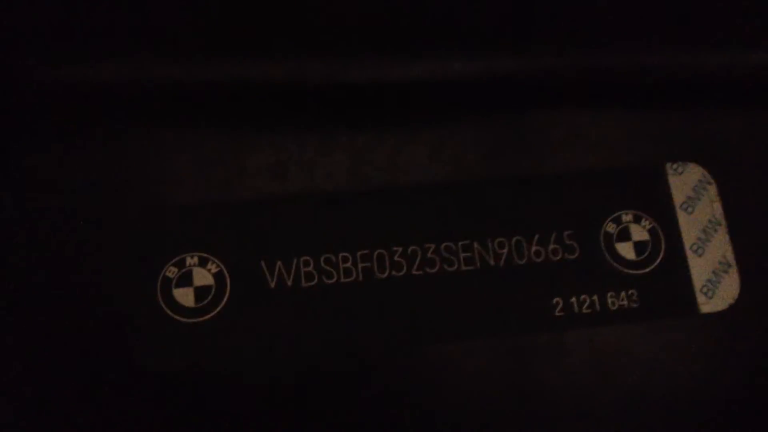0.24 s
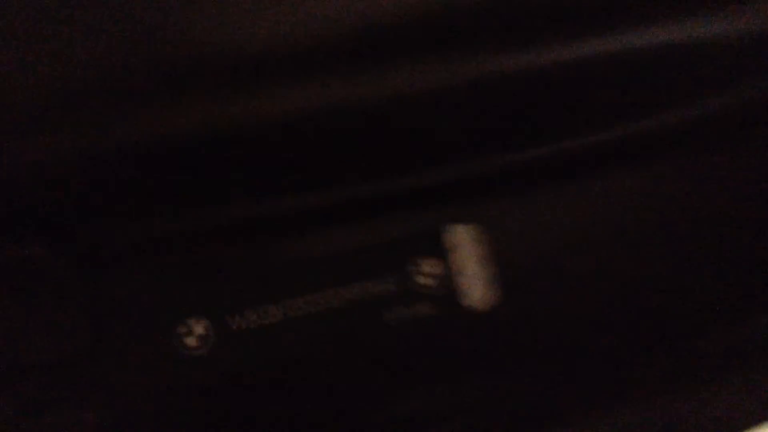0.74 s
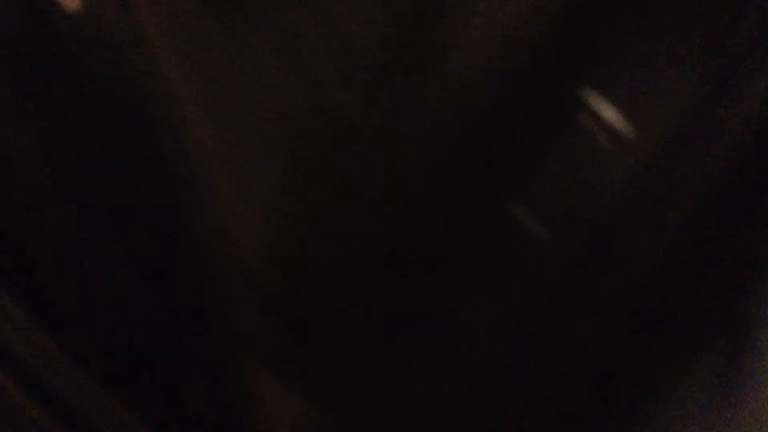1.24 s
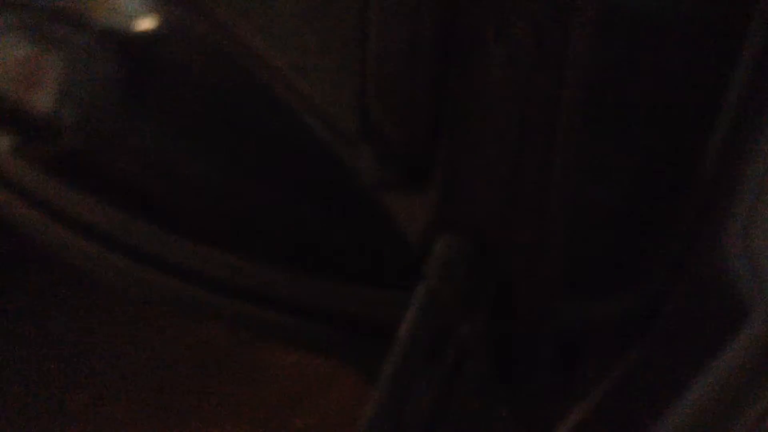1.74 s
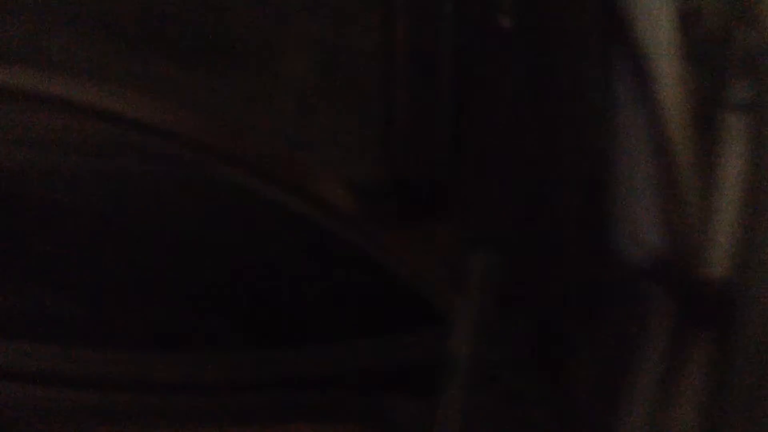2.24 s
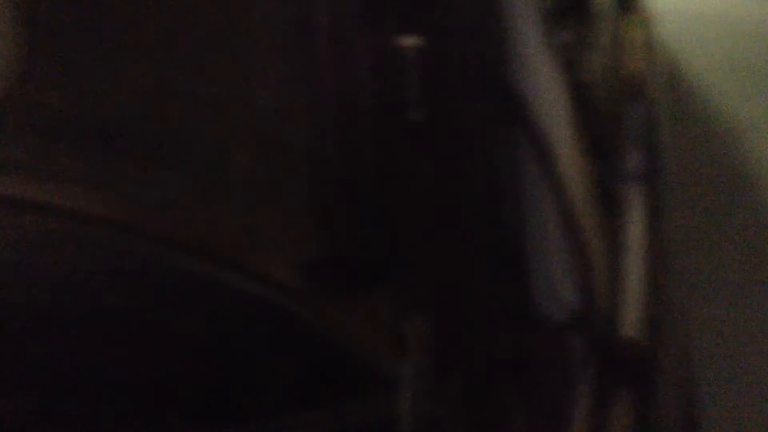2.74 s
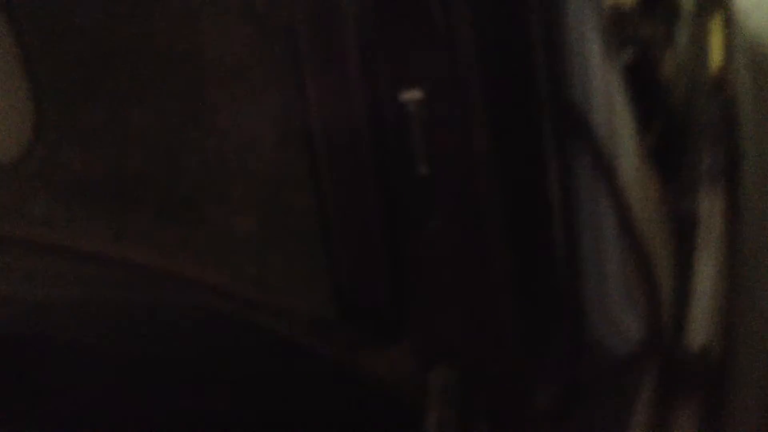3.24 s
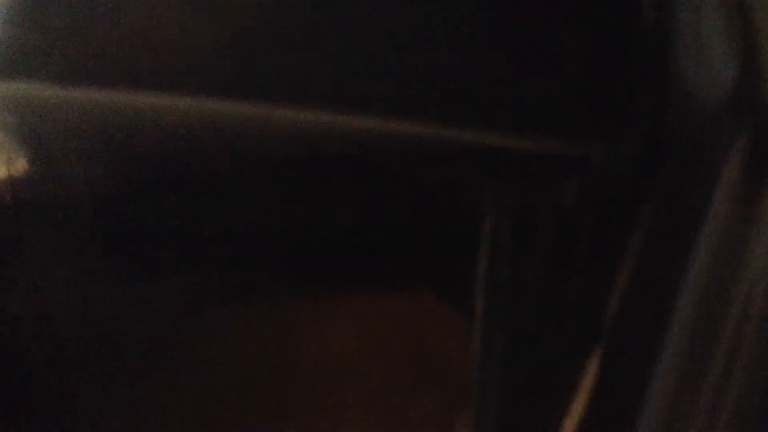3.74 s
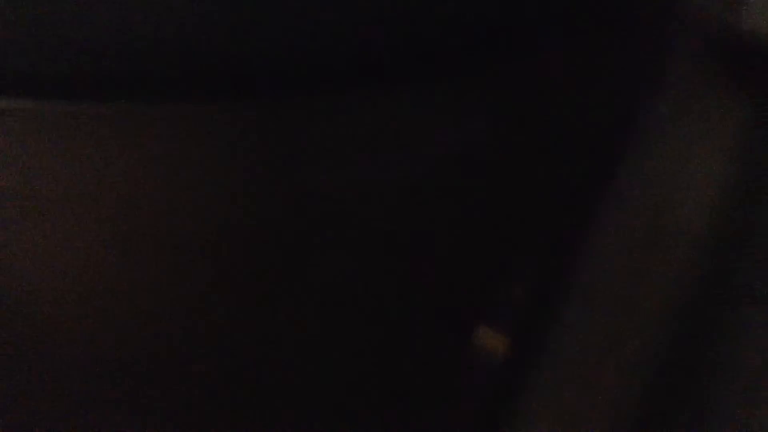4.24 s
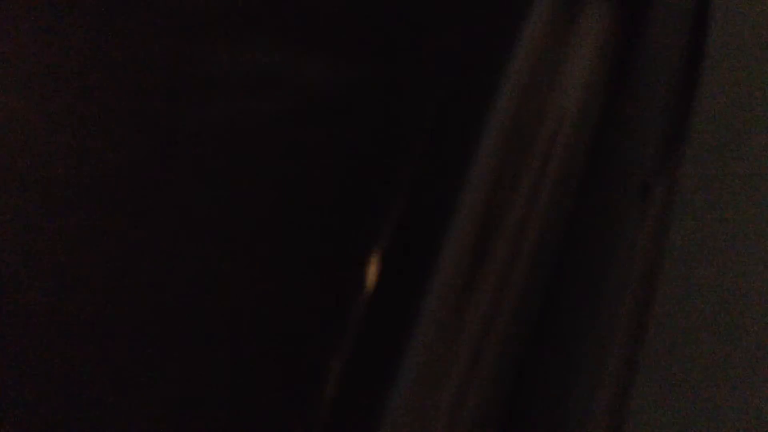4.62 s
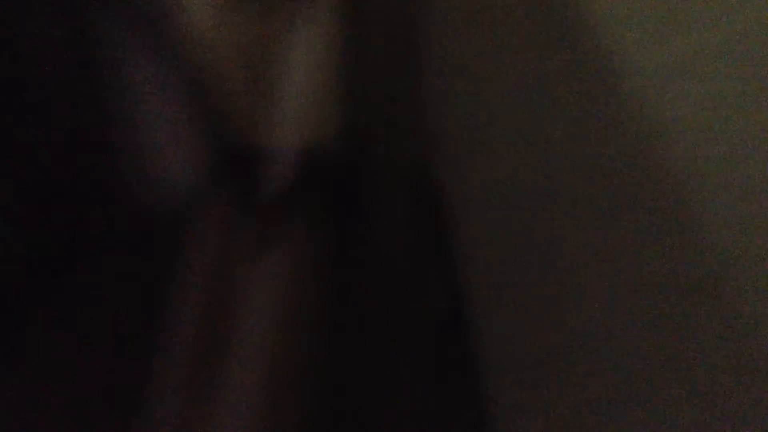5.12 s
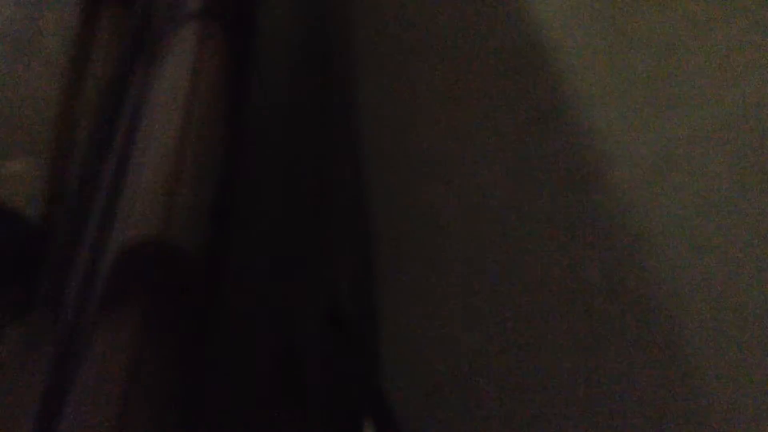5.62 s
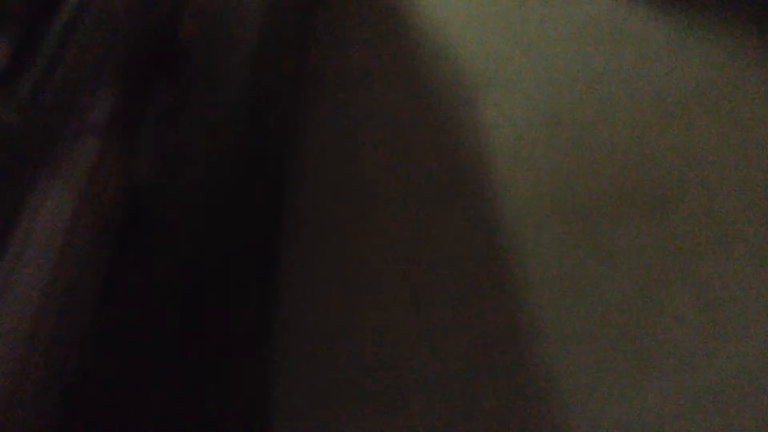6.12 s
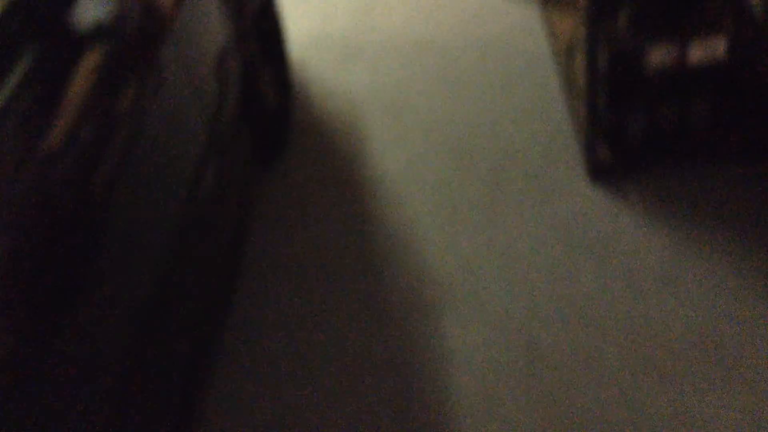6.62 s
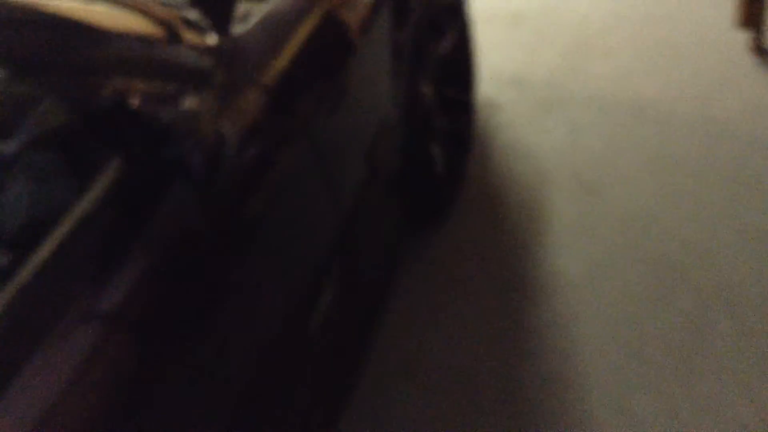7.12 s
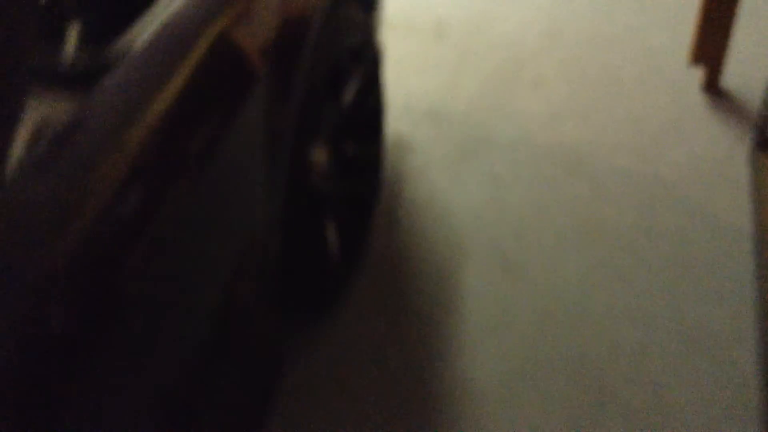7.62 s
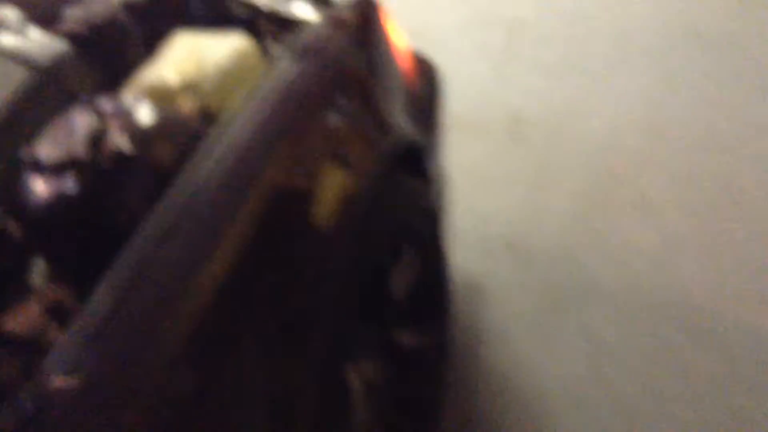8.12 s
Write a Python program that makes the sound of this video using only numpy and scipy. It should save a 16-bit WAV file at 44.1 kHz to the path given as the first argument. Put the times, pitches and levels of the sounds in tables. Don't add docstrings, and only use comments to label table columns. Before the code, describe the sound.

Steady low engine idle with buzzing panels and belt hiss, brief squeaky shoe scuffs, two thin clicks, then one loud nearby car door slam.

```python
import sys
import numpy as np
from scipy import signal
from scipy.io import wavfile

SR = 44100
rng = np.random.default_rng(int(sys.argv[2]) if len(sys.argv) > 2 else 0)


def int16_out(signal):
    q = np.round(np.clip(np.atleast_2d(signal).T, -1, 1) * 32767)
    wavfile.write(sys.argv[1], SR, q.astype(np.int16))


def voltage_ratio(decibels):
    exponent = np.asarray(decibels, float) / 20
    return 10 ** exponent


N = 368676

# (time [s], exhaust level [dB],
# lean of the garage's standing waves away from the main mode [dB])
TAILPIPE_WALK = [(0.0, -19, -1), (0.77, -14, -4), (1.14, -18, 3), (2.89, -18.5, 2), (3.7, -18.5, 2),
                 (4.05, -16.5, -5.5), (4.31, -20, 2.5), (4.51, -19.5, -2), (5.08, -18, -0.5),
                 (5.26, -15.5, -9), (5.87, -21, -0.5), (6.22, -25, -3.5), (6.55, -33.5, 4),
                 (6.96, -27.5, 0.5), (7.24, -26, 4), (7.68, -35, 14), (7.94, -26, 6.5), (8.36, -28.5, 2)]
# (time [s],
# panels [dB], bay # [dB]), 0 = usual level
NEARNESS = [(0, 5.5, 1), (.7, 5, 0), (1.0, 2, 1.3), (1.6, 7, 0.8), (2.2, -2, 0.5), (3.1, -2.5, 0.5),
            (3.45, 1, 0), (4.3, 1, 0.5), (4.5, -.5, -2.5), (5.2, 0.5, -1), (5.7, -5.5, 0.6), (6.4, 1.5, 2),
            (7.3, 2.5, 3.5), (7.6, -2, 3), (8.0, 0.5, 4.5), (8.36, -2.5, 6)]
PANEL_DB = -35.5


def rms_one(x):
    return x / np.sqrt(np.mean(x ** 2) + 1e-20)


def in_time(rows):
    s, *columns = np.transpose(rows)
    return [np.interp(np.arange(N) / SR, s, c) for c in columns]


def at_hz(points, hz):
    table_hz, values = np.array(points).T
    return np.interp(np.log(hz), np.log(table_hz), values)


def drift(rate):
    r = np.exp(-80 * np.pi * rate / SR)
    slow = signal.lfilter([1], [1, -2 * r, r * r], rng.standard_normal(N // 40 + 2002))[2000:]
    return np.interp(np.arange(N) / 40, np.arange(len(slow)), rms_one(slow))


def resonance(x, hz, width_hz):
    r = np.exp(-np.pi * width_hz / SR)
    section = [(1 - r * r) / 2, 0, (r * r - 1) / 2, 1, -2 * r * np.cos(2 * np.pi * hz / SR), r * r]
    return signal.sosfilt([section, section], x + 1e-18)


def bands(spectrum, size=N):
    low, high = spectrum[0][0], spectrum[-1][0]
    edges = np.geomspace(low, high, int(3 * np.log2(high / low)) + 2)
    centres = np.sqrt(edges[1:] * edges[:-1])
    white = rng.standard_normal((2, size + SR // 4))
    noise = []
    for k, hz in enumerate(centres):
        band_pass = signal.butter(2, edges[k:k + 2], "band", fs=SR, output="sos")
        noise.append(voltage_ratio(at_hz(spectrum, hz)) * signal.sosfilt(band_pass, white[k % 2])[-size:])
    noise = np.array(noise)
    return centres, noise / np.std(noise.sum(axis=0))


def pulses(at_s, sizes):
    out = np.zeros(N + 2 * SR)
    np.add.at(out, np.round((at_s + 1) * SR).astype(int), sizes)
    return out


def crossing(peaks, between_db):
    t = np.arange(N) / SR
    return voltage_ratio(between_db) + sum(voltage_ratio(db) * np.exp(-((t - s) / width_s) ** 2) for s, width_s, db in peaks)


def exhaust(turned, uneven_db):
    # (strength [dB], lag in the manifold [ms])
    cylinders = [(5.0, -0.55), (-0.3, -2.07), (-0.9, -0.72), (-2.1, -1.87), (1.1, -0.71), (-2.8, -1.15)]
    # (frequency at steady speed [Hz], width [Hz], level
    # [dB], polarity [+-1])
    pipe = [(63.0, 71.3, -51.3, 1), (122.1, 56.4, -40.9, 1), (152.4, 14.9, -20.4, 1),
            (176.3, 10.0, -9.9, 1), (186.8, 17.4, -20.6, -1), (215.0, 11.8, -32.2, 1),
            (232.5, 11.5, -24.4, 1), (266.9, 55.6, -42.0, 1), (275.4, 90.0, -51.9, -1),
            (330.9, 10.0, -46.9, -1)]
    # (time [s], half width [s], level [dB])
    high_mode_peaks = [(1.3, 0.71, -33), (3.0, 1.3, -30), (5.3, 0.36, -35), (6.2, 0.23, -31.5),
                       (7.0, 0.44, -37), (8.36, 0.37, -30.5)]
    steady_cycles_per_s = 6.19

    firing = np.arange(-30, 330)
    strength_db, lag_ms = np.transpose(cylinders)[:, firing % 6]
    sizes = voltage_ratio(strength_db + uneven_db * rng.standard_normal(len(firing)))
    fired = pulses(firing / 6 / steady_cycles_per_s + lag_ms / 1000, sizes)
    low_cut = signal.butter(8, 143.4, "high", fs=SR, output="sos")
    fired = signal.sosfiltfilt(low_cut, fired)

    groups = np.zeros((3, len(fired)))
    for hz, width_hz, db, polarity in pipe[2:]:
        group = np.searchsorted([160, 220], hz)
        groups[group] += polarity * voltage_ratio(db) * resonance(fired, hz, width_hz)
    read_at = SR * (1 + turned / steady_cycles_per_s)
    heard = [rms_one(np.interp(read_at, np.arange(len(fired)), v)) for v in groups]

    level_db, lean_db = in_time(TAILPIPE_WALK)
    low_gain = voltage_ratio(level_db - 6.5 + 0.96 * lean_db)
    high_gain = crossing(high_mode_peaks, -49.5)
    gains = [low_gain, voltage_ratio(level_db), high_gain]
    return sum(gain * v for gain, v in zip(gains, heard))


def drone(turned):
    # (order [per engine cycle], level [dB])
    low_orders = [(6, -20), (9, -5), (12, 0), (15, -1)]
    # (time [s], half width [s], level [dB])
    peaks_18 = [(1.2, 0.31, -48), (2.6, 0.65, -48), (6.4, 0.75, -42.5), (7.9, 0.47, -44)]
    peaks_36 = [(0, 0.27, -37), (5.27, 0.099, -26.5), (5.95, 0.47, -26), (7.6, 0.29, -32), (8.3, 0.14, -37)]
    peaks_39 = [(.2, 0.58, -26), (2.3, 0.13, -38), (3.3, 1, -39), (5.7, .6, -31), (7.3, 0.42, -37)]
    peaks_30 = [(0, 0.46, -19.5), (5.4, .3, -64), (7.1, .3, -35.5), (8.36, 0.22, -28.5)]
    peaks_whine = [(0, 0.71, -47), (1.5, 0.37, -50), (3.3, 0.99, -52), (6.1, 0.57, -50),
                   (8.36, 0.68, -46.5)]
    floor_db = (-51.5, -68, -87.5, -72, -56)

    low_db = -59.5 + 0.37 * (in_time(TAILPIPE_WALK)[0] + 18)
    *high, thin = map(crossing, [peaks_18, peaks_36, peaks_39, peaks_30, peaks_whine], floor_db)
    orders = [(order, voltage_ratio(low_db + db)) for order, db in low_orders]
    orders += list(zip([18, 36, 39, 30], high))
    hum = 0
    for order, gain in orders:
        hum = hum + gain * np.sqrt(2) * np.cos(2 * np.pi * (order * turned - .2))
    whine = np.sin(2 * np.pi * 199.2 * turned + 1.4 * drift(8))
    return hum + thin * voltage_ratio(2.2 * drift(5)) * whine


def panels(turned, loose_db, shaken):
    # (frequency [Hz], width [Hz], level [dB], place in the cycle [0-1])
    loose_panels = [(242, 35, -6, 0.5), (302.8, 24, -4.5, .89), (327.7, 52, -8, 0.5),
                    (407.2, 22, 1.5, 0.72), (451, 24, -11, 0.17), (727, 20, -17, 0.3)]
    firing = np.arange(54 * 6)
    near_db = in_time(NEARNESS)[0]
    thick_db, thin_db = PANEL_DB + near_db, -40.5 + 0.42 * near_db
    out = 0
    for hz, width_hz, db, place in loose_panels:
        chance = rng.standard_normal((len(firing), 3))
        due = firing / 6 + place - 1 + .012 * chance[:, 1]
        sizes = np.where(firing % 6 == 0, voltage_ratio(loose_db * chance[:, 0]), .4 * chance[:, 2])
        at_s = np.interp(due, turned, np.arange(N) / SR, left=-.05, right=N / SR)
        knock = pulses(at_s, sizes)
        drive = rms_one(knock) + shaken * rng.standard_normal(len(knock))
        ring = rms_one(resonance(drive, hz, width_hz)[SR:SR + N])
        out = out + voltage_ratio(db + (thin_db if hz > 350 else thick_db)) * ring
    return out


def engine():
    # (time [s], engine cycles per second [Hz])
    crank = [(0.0, 5.992), (0.71, 6.044), (1.22, 6.319), (1.8, 6.232), (2.02, 6.229), (2.72, 6.13),
             (3.22, 6.248), (3.49, 6.246), (3.97, 6.07), (4.36, 6.141), (4.59, 6.109), (4.95, 6.145),
             (5.31, 6.009), (5.78, 6.249), (6.38, 6.315), (7.11, 6.231), (7.53, 6.13), (8.4, 6.286)]
    turned = np.cumsum(in_time(crank)[0]) / SR
    return exhaust(turned, uneven_db=1.1) + drone(turned) + panels(turned, loose_db=1.5, shaken=.25)


def engine_bay(patchy_db):
    # (frequency [Hz], level per Hz [dB])
    hiss_colour = [(420, -31), (725, -1.5), (1250, -2.5), (1450, -5), (4400, -6), (6480, -7.5), (9000, -10),
                   (17000, -14)]
    # (frequency [Hz], level per Hz [dB])
    rumble_colour = [(25, -38), (60, -33), (90, -28), (125, -13), (170, 0), (250, -3), (320, -5), (400, -6),
                     (520, -12)]
    # (frequency [Hz], width [Hz], level [dB], share of the nearness swing)
    intake = [(593, 53, -57, 1.8), (2234, 180, -56.5, 0.57)]
    bay_follows = (0.66, 0.93, 0.93, 1.6)
    hiss_db, rumble_db = -38.5, -39.5

    panel_db, bay_db = in_time(NEARNESS)
    parts_db = np.outer(bay_follows, bay_db)
    leaning_in = np.clip((0.75 - np.arange(N) / SR) / .15 + .5, 0, 1)
    parts_db += np.outer((3.5, -1.5, 1, -1.5), leaning_in)
    parts_db[0] += .15 * panel_db

    centres, noise = bands(hiss_colour)
    out, together = 0, drift(29)
    for hz, band in zip(centres, noise):
        share = [at_hz(list(zip([1200, 1900, 6000, 14000], row)), hz) for row in np.eye(4)]
        out = out + voltage_ratio(share @ parts_db + patchy_db * (together + drift(12.5))) * band
    out = signal.sosfilt(signal.butter(2, 10300, fs=SR, output="sos"), out)
    for hz, width_hz, db, follows in intake:
        hollow = rms_one(resonance(rng.standard_normal(N), hz, width_hz))
        out += voltage_ratio(db - hiss_db + follows * bay_db) * hollow
    rumble = bands(rumble_colour)[1].sum(axis=0)
    return voltage_ratio(hiss_db) * out + voltage_ratio(rumble_db + .6 * (PANEL_DB + panel_db + 40)) * rumble


def scuff():
    # (start [s], hold [s], sole [dB], squeak [dB])
    strokes = [
        (1.3, 0.026, -46, -46),
        (1.474, 0.052, -37, -44),
        (1.534, 0.034, -40.5, -50),
        (1.609, 0.038, -39, -42),
        (1.705, 0.05, -43.5, -57),
    ]
    # (frequency [Hz], level per Hz [dB])
    sole_colour = [(280, 10), (400, 8), (540, -0.5), (680, -10), (1200, -5), (1700, -10.5), (3200, -15.5),
                   (4500, -35)]
    attack_s, t60_s = 0.019, 0.41

    t, drag, chirp = np.arange(N) / SR, 0, 0
    for s, hold_s, sole_db, squeak_db in strokes:
        after = np.maximum(t - s - attack_s - hold_s, 0)
        shape = np.clip((t - s) / attack_s, 0, 1) ** 2 * voltage_ratio(-60 * after / t60_s) ** 2
        drag = drag + voltage_ratio(2 * sole_db) * shape
        chirp = chirp + voltage_ratio(2 * squeak_db) * shape
    sole = bands(sole_colour)[1].sum(axis=0)
    sole = sole + voltage_ratio(-15.5) * rms_one(resonance(rng.standard_normal(N), 2235, 160))
    squeak = rms_one(resonance(rng.standard_normal(N), 6500, 830))
    grit = voltage_ratio(1.5 * drift(90))
    return voltage_ratio(9.5) * grit * np.sqrt(drag) * sole + np.sqrt(chirp) * squeak


def latch():
    # (time [s], peak [dB], t60 [s])
    ticks = [
        (3.722, -37, 0.18),
        (3.873, -24, .015),
    ]
    t, shape = np.arange(N) / SR, 0
    for s, db, t60 in ticks:
        shape = shape + (t >= s) * voltage_ratio(db - 60 * np.maximum(t - s, 0) / t60)
    bright = signal.butter(2, 7000, "high", fs=SR, output="sos")
    return shape * signal.sosfilt(bright, rng.standard_normal(N))


def door():
    # (time [s], level [dB], tilt [dB per octave], rise [s])
    contacts = [
        (4.310, -8.5, 0, 0.0012),
        (4.326, -15.5, 2, 0.00075),
        (4.338, -31, -4, 0.0041),
    ]
    # (frequency [Hz], level per Hz [dB])
    door_colour = [(70, -33), (160, -3), (300, -4), (400, 0), (560, -3), (800, -5.5), (1050, -14.5),
                   (1500, -8.5), (2150, -7.5), (3000, -9.5), (4090, -10), (8000, -22), (16500, -37.5)]
    # (frequency [Hz], t60 [s])
    door_t60 = [(80, 0.75), (300, 0.24), (1000, 0.13), (3000, 0.091), (8000, 0.11), (15000, 0.087)]
    # (frequency [Hz], level [dB], t60 [s], held to 0.2 at most)
    sheet_modes = [(410, -12, 0.26), (800, -12, 0.52), (1030, 12.5, 0.22), (1530, -21, 3.6),
                   (1739, -7, 0.15), (2040, 0, 0.95), (2315, -17, 0.22), (2326, -10, 0.24),
                   (2960, 9, 0.072), (3050, -22, 0.56), (3250, -23, 0.41), (3600, -8, 0.1),
                   (4120, -7, 0.067), (4460, -26, 0.91)]
    garage_t60_s, garage_db = 0.79, -21.5

    first_s = contacts[0][0]
    start = round(first_s * SR)
    t = np.arange(SR) / SR + first_s
    centres, noise = bands(door_colour, size=SR)
    slam = 0
    for hz, band in zip(centres, noise):
        for s, db, tilt_db, rise_s in contacts:
            age = np.maximum(t - s, 0)
            swell = 1 - np.exp(-age / (rise_s + 2.0 / hz))
            dying = voltage_ratio(-60 * age / at_hz(door_t60, hz)) + voltage_ratio(garage_db - 60 * age / garage_t60_s)
            level_db = db + tilt_db * np.log2(hz / 2000) + 0.72 * rng.standard_normal()
            slam = slam + voltage_ratio(level_db) * swell * dying * band
    age = t - t[0]
    for hz, db, t60 in sheet_modes:
        slam = slam + voltage_ratio(db - 32 - 60 * age / min(t60, .2)) * np.sin(2 * np.pi * hz * age)
    out = np.zeros(N)
    out[start:start + SR] = slam
    return out


def scene():
    return (engine() + engine_bay(patchy_db=0.57) + scuff() + latch() + door())[None]


def roll_off(x):
    return signal.sosfilt(signal.butter(12, 15430, fs=SR, output="sos"), x)


def record(dry):
    rounded = .9 * np.tanh(dry / .9)
    top_cut = signal.cheby2(12, 60, 16000, fs=SR, output="sos")
    finished = signal.sosfilt(top_cut, rounded)
    return roll_off(finished)


dry = scene()
out = record(dry)
int16_out(out)
```